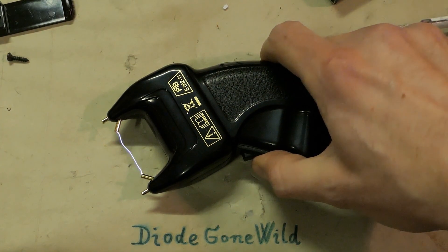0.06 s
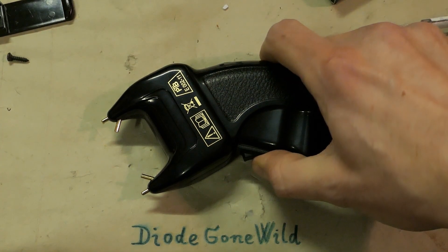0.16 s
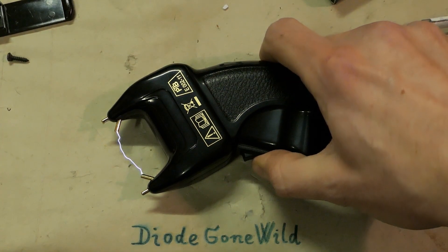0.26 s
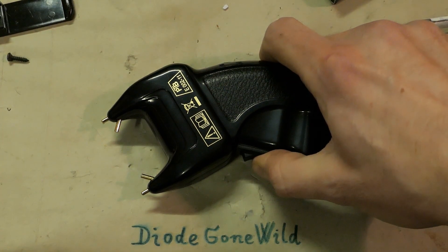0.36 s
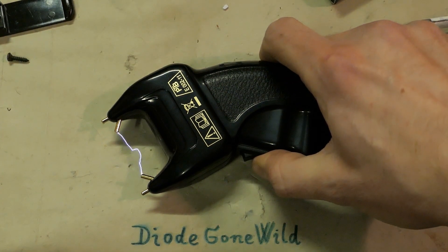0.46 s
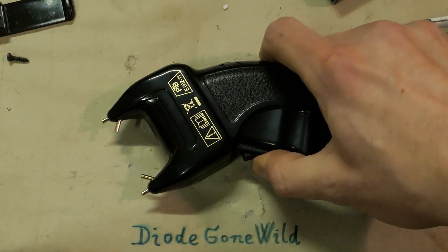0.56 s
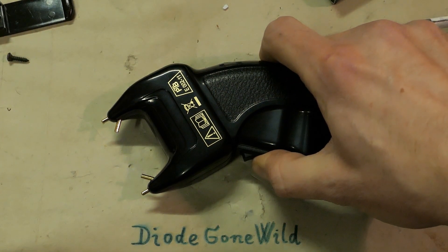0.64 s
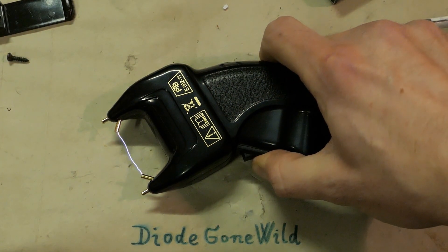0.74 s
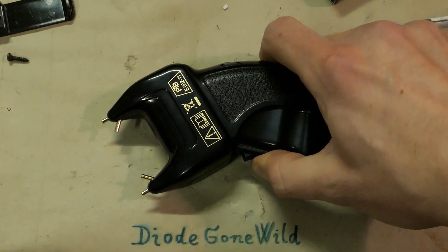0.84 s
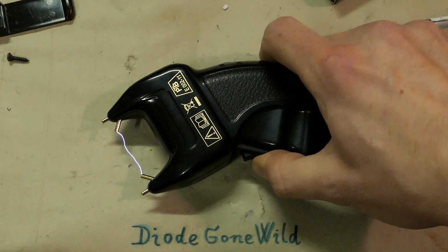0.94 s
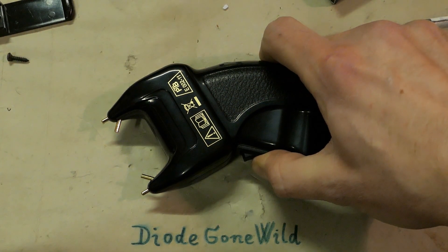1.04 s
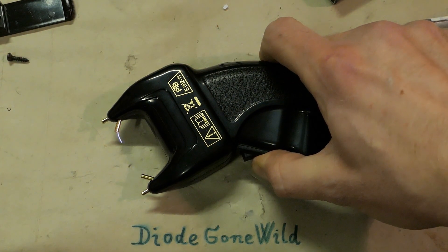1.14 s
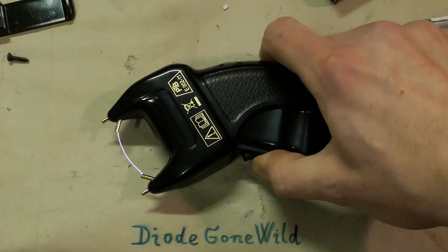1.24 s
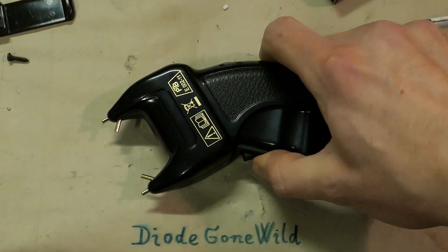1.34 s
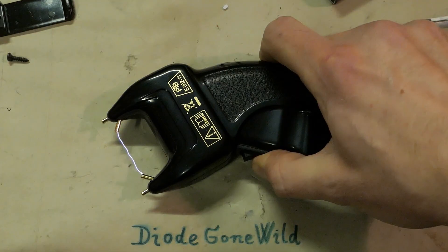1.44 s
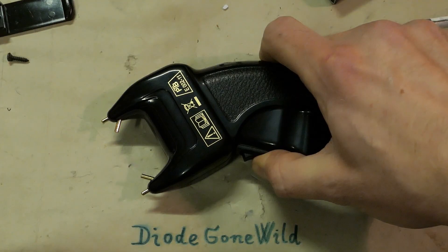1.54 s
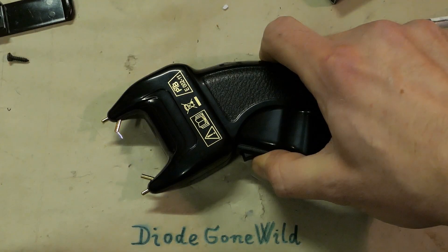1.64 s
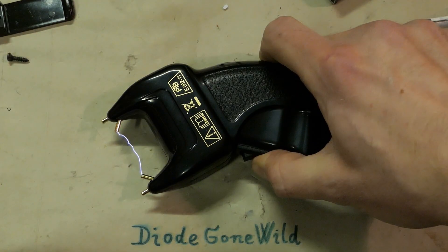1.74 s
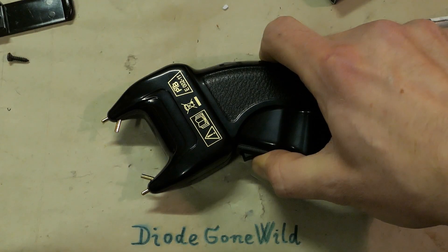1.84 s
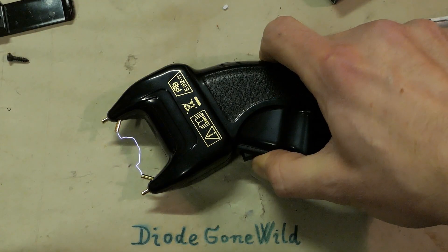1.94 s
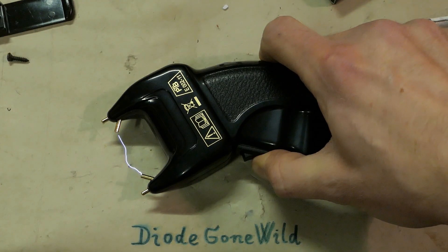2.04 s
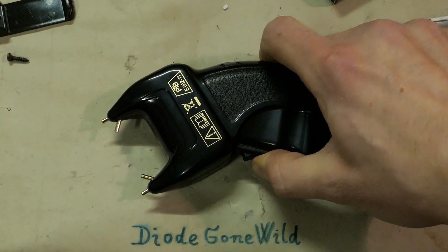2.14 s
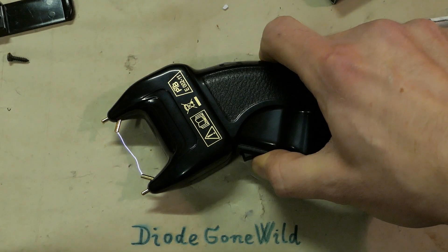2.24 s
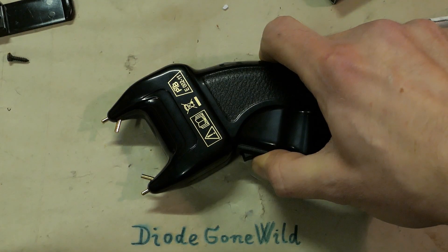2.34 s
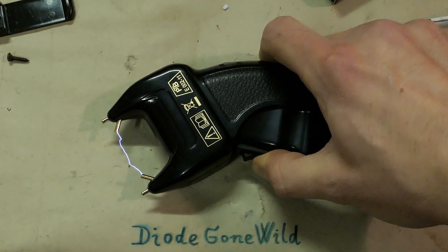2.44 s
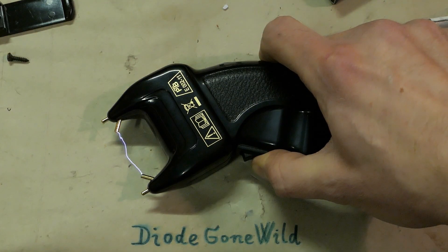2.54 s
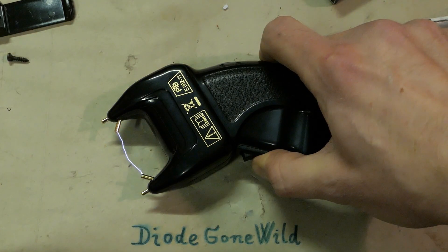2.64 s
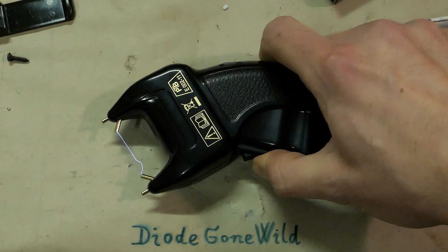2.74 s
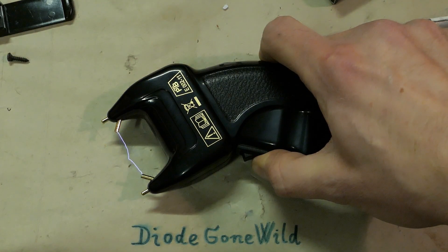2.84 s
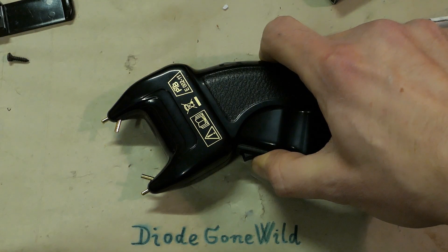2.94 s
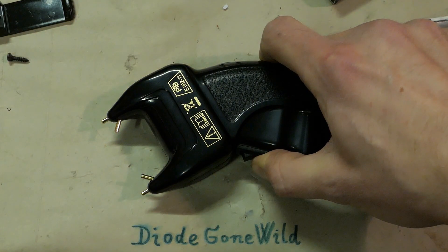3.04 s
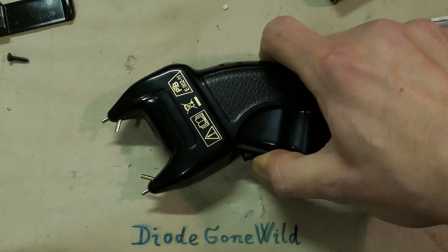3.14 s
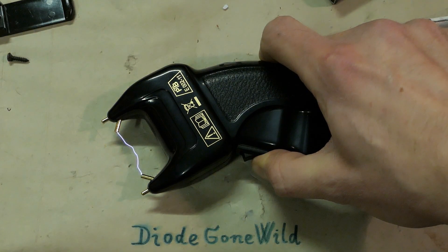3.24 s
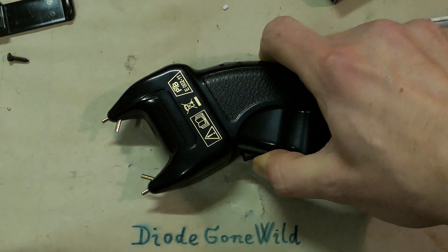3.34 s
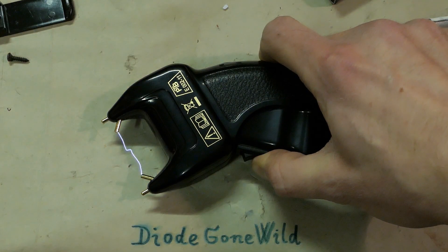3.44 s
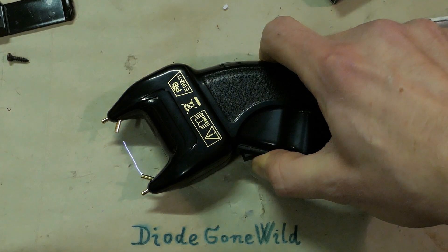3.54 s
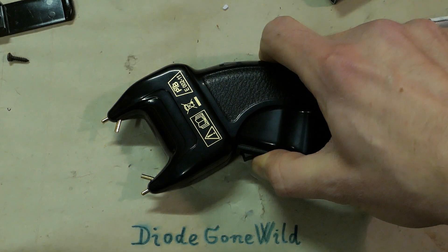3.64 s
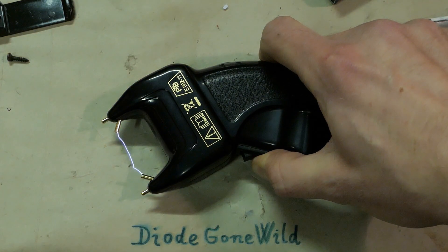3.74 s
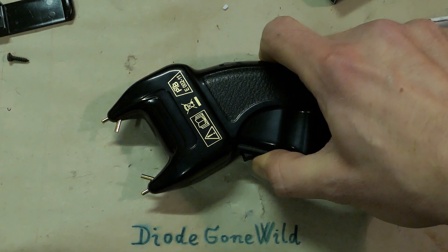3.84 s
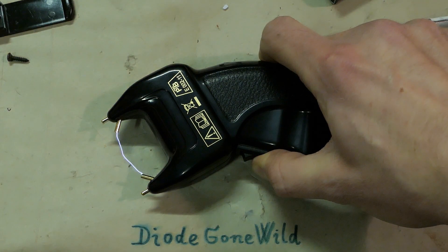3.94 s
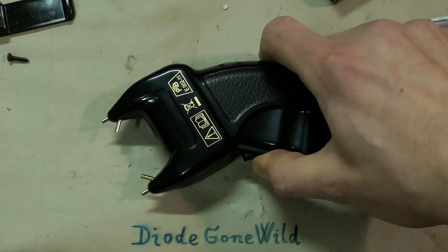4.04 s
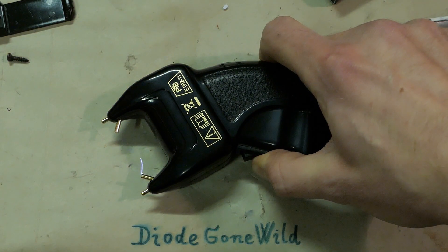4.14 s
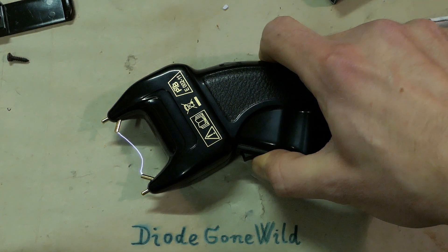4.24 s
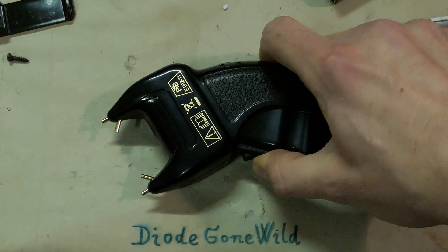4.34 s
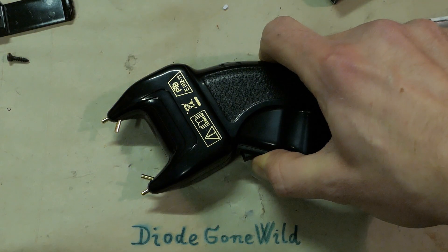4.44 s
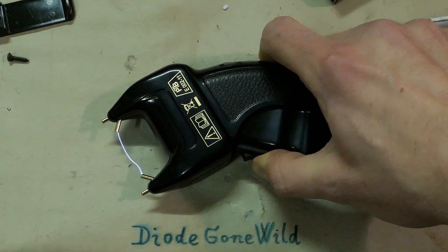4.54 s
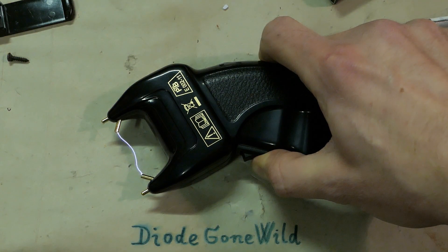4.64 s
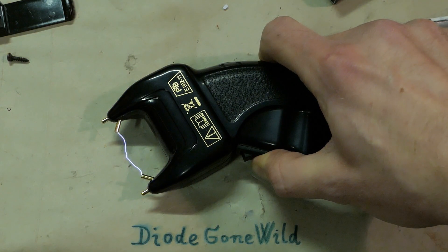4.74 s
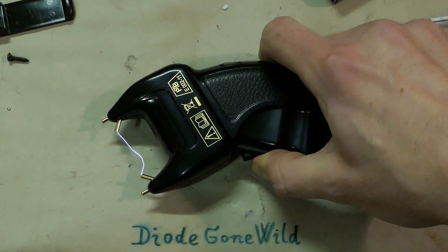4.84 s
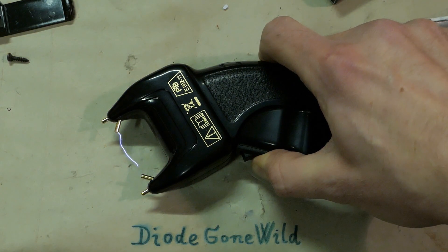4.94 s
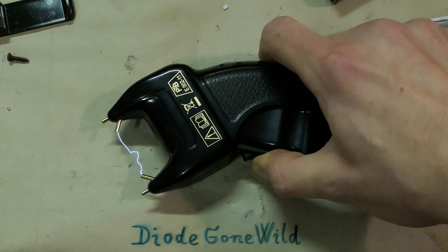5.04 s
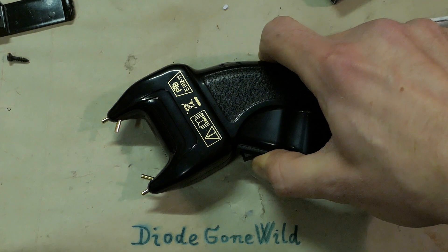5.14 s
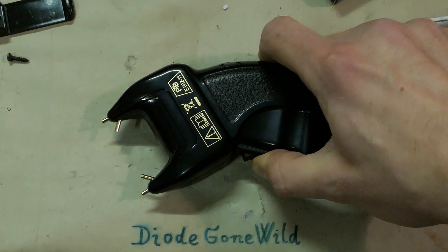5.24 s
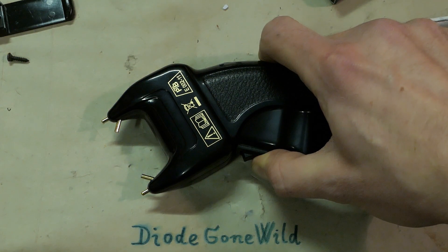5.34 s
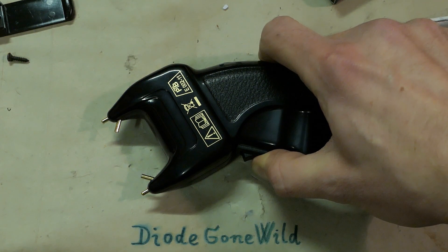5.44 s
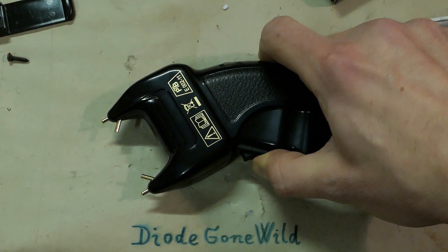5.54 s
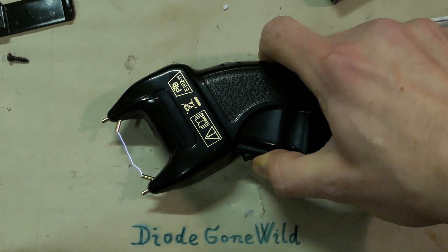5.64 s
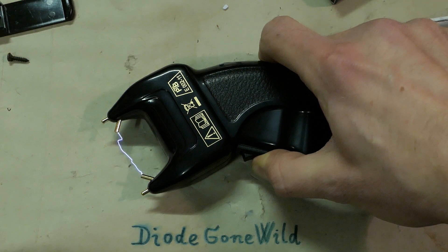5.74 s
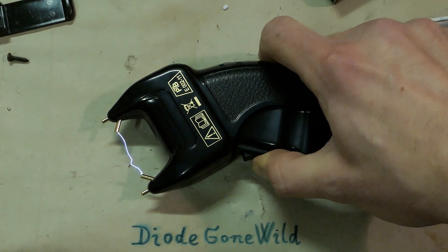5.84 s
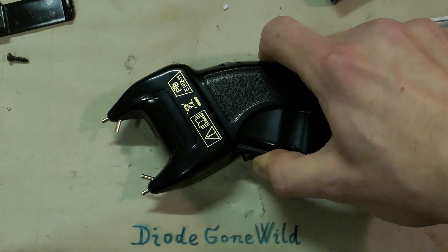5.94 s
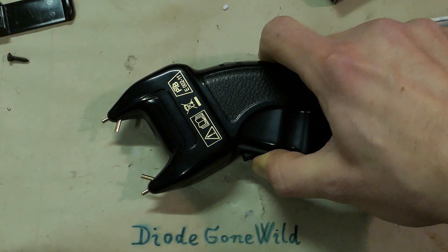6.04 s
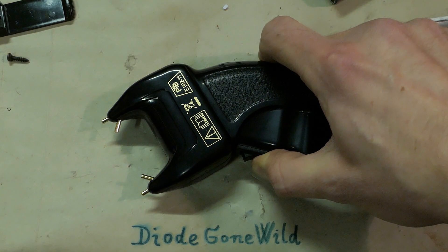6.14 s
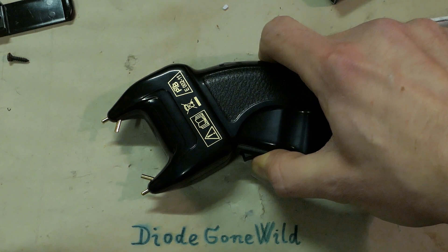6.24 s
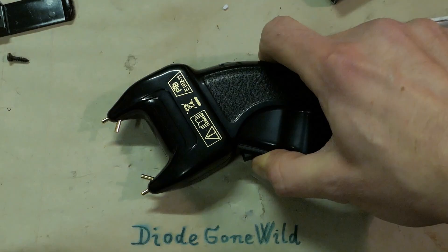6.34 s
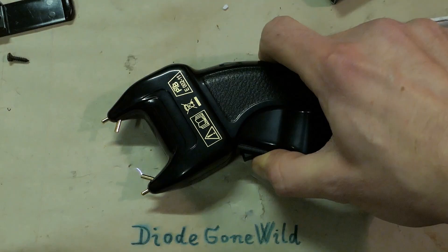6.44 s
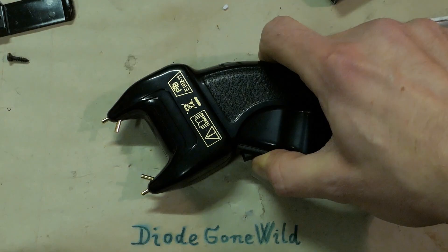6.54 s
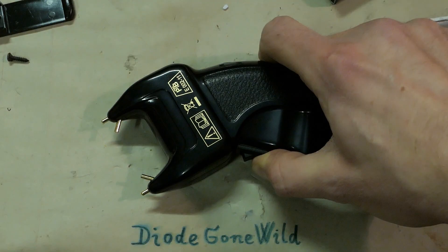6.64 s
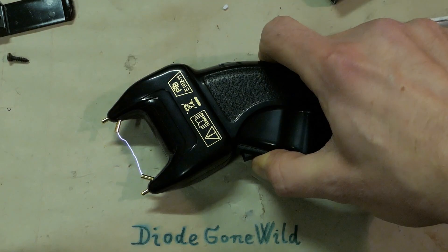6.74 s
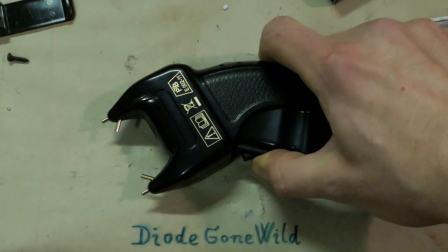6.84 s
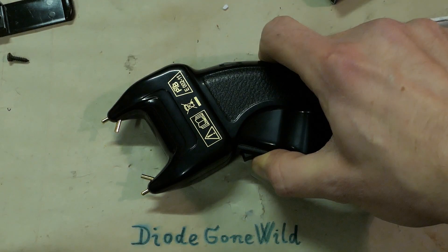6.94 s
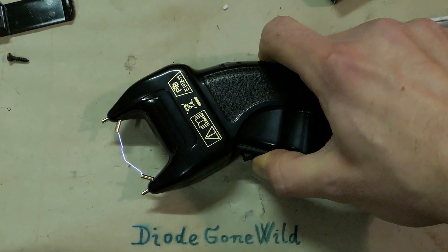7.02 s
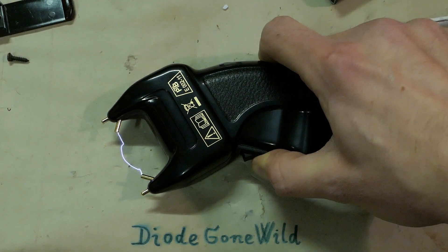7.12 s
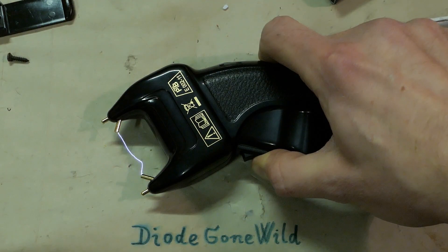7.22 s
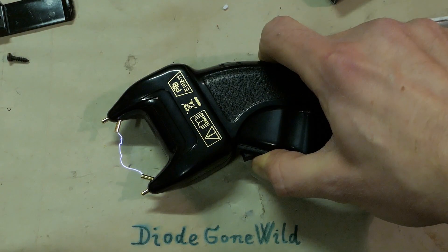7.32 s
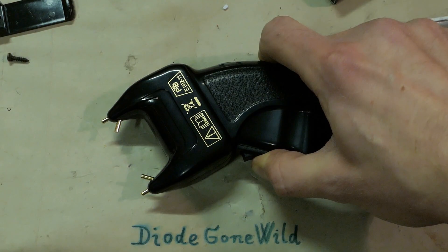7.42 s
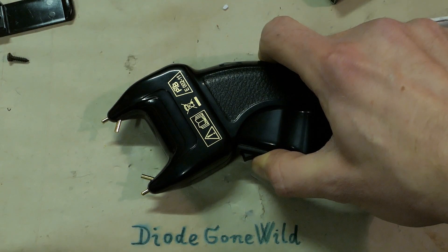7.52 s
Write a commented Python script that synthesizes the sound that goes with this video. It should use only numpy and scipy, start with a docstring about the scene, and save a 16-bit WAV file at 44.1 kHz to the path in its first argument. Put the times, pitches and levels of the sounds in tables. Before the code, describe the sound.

A stun gun held over a workbench is already firing at the start: sharp, bright electric snaps, about twenty-five a second, in a steady rattling clatter. Dull low thumps accompany the early sparks. Just before three seconds the snaps crowd together in a buzzing burst, then return to their former pace and slowly become sparser and weaker until the end. Close stereo microphone, small room, short reflections, very faint hiss.

```python
"""In a small room, a hand-held high-voltage device arcs across its electrodes above a workbench.
Each spark is a sharp crack (short pulses through broad resonances) with a soft low push of heated air.
Single echoes, bench clutter and a short room tail answer it. Jolts of the microphone circuit add dull thumps,
roughly opposite in the two channels and mostly faint later on. After a hurried burst near 2.6-2.9 s the sparks
gradually slow; the cracks weaken as the battery sags. Faint hiss lies underneath."""
import sys
import numpy as np
from scipy import signal
from scipy.fft import rfft, irfft
from scipy.io import wavfile

SR = 44100
rng = np.random.default_rng(int(sys.argv[2]) if len(sys.argv) > 2 else 0)


def dump(signal):
    """Clip the signal to [-1, 1] and save it as 16-bit WAV at the path in sys.argv[1]."""
    limited = np.clip(np.atleast_2d(signal).T, -1, 1)
    pcm = np.round(limited * 32767).astype(np.int16)
    wavfile.write(sys.argv[1], SR, pcm)


def level_to_linear(level):
    """Convert decibel levels to linear amplitude factors, elementwise."""
    exponent = np.asarray(level, float) / 20
    return 10 ** exponent


N = 334101
LEAD = 4410   # samples of run-up, cut off before the scene starts

# reflections scattered by bench and room, one frequency band per row:
# low_hz, high_hz, bench_db, bench_t60_s, room_db, room_t60_s, side_db (side relative to mid)
SCATTER_BANDS = [(150, 640, -29, 0.016, -52.5, 0.5, 3), (1000, 4220, -20.5, 0.032, -40, 0.4, -8),
                 (3860, 10140, -27.5, 0.015, -36.5, 0.13, -18), (8300, 20700, -45, 0.049, -39.5, 0.14, -4)]


def band(x, low_hz, high_hz):
    """Butterworth band-pass."""
    edges_hz = [low_hz, min(high_hz, 0.45 * SR)]
    return signal.sosfilt(signal.butter(2, edges_hz, "band", fs=SR, output="sos"), x)


def lowpass(x, hz):
    """First-order low-pass: a gentle dulling."""
    return signal.lfilter(*signal.butter(1, hz, fs=SR), x)


def highpass(x, order, hz):
    """Butterworth high-pass."""
    return signal.sosfilt(signal.butter(order, hz, "high", fs=SR, output="sos"), x)


def resonance(x, hz, width_hz):
    """Two-pole resonance with a gain of about 1 at its peak."""
    radius = np.exp(-np.pi * width_hz / SR)
    zeros = (1 - radius ** 2) / 2 * np.array([1, 0, -1])
    poles = [1, -2 * radius * np.cos(2 * np.pi * hz / SR), radius ** 2]
    return signal.lfilter(zeros, poles, x)


def all_pass(x, pole):
    """First-order all-pass: a positive pole delays the lows more, a negative one the highs."""
    return signal.lfilter([-pole, 1], [1, -pole], x)


def convolve(x, response):
    """Long convolution along time, cut to the length of x."""
    return signal.fftconvolve(x, response, axes=-1)[..., :x.shape[-1]]


def strengths(s):
    """Relative crack and thump levels in dB, from spark time, the wait before it and chance."""
    # usual size of the thump over time: time_s, level_db (relative)
    usual_thumps = [(0, -21), (2.4, -22.5), (3.2, -29), (4.2, -32.), (4.9, -46), (7.6, -54)]
    # sparks that thump harder than their neighbours: time_s, level_db (relative)
    hard_thumps = [(2.138, -17), (2.256, -17.5), (5.827, -37), (5.889, -38), (6.016, -29), (6.160, -33),
                   (6.728, -35), (7.173, -33), (7.377, -43)]
    usual_wait_s = 0.04
    start_db, sag_db_per_s = -3.5, 0.9063
    crack_db_per_doubled_wait, crack_spread_db = 2, 0.74
    thump_db_per_doubled_wait, thump_spread_db = 8, 4.5

    doublings = np.log2(np.diff(s, prepend=s[0] - usual_wait_s) / usual_wait_s)
    chance = rng.standard_normal((len(s), 2))
    crack_db = start_db - sag_db_per_s * s   # the battery sags
    crack_db += crack_db_per_doubled_wait * doublings   # a longer wait stores more charge
    crack_db += crack_spread_db * chance[:, 0]
    thump_db = np.interp(s, *np.transpose(usual_thumps))
    thump_db += thump_spread_db * np.minimum(chance[:, 1], 1)
    thump_db += thump_db_per_doubled_wait * np.minimum(doublings, 0)   # hurried sparks hardly thump
    for hard_s, hard_db in hard_thumps:
        thump_db[np.argmin(abs(s - hard_s))] = hard_db
    return crack_db, thump_db


def cracks(at, level_db):
    """The arc is a line source: a near-end shock, then a duller far-end one of opposite sign; returns both."""
    # broad resonances that colour the crack: centre_hz, width_hz, level_db (relative)
    crack_modes = [(1180, 2400, -13.5), (2920, 7860, -5.5), (7254, 1150, 3.5), (10490, 2310, -0.5),
                   (14230, 2350, 2.5)]
    span_ms, bend = 0.222, 0.13   # lag from end to end, its relative spread
    far_db, far_hz = -4, 9000
    colour_db = 0.5   # spread of each resonance from spark to spark
    kink, kink_spread = 0.11, 0.11   # shock from near the middle, relative to the near end

    # the path bends anew each time, which shifts the lag and the colour
    chance = rng.standard_normal((len(at), 2 + len(crack_modes)))
    lag = span_ms * SR / 1000 * (1 + bend * chance[:, 0])
    whole, part = lag.astype(int), lag % 1
    shocks = 0
    for k, (hz, width_hz, mode_db) in enumerate(crack_modes):
        ends = np.full((2, N + LEAD), 1e-18)
        height = level_to_linear(level_db + mode_db + colour_db * chance[:, 1 + k])
        ends[0, at] = height
        ends[0, at + whole // 2] = height * (kink + kink_spread * chance[:, -1])
        # the lag falls between two samples
        ends[1, at + whole] = height * (1 - part)
        ends[1, at + whole + 1] = height * part
        shocks = shocks + (-1) ** k * resonance(ends, hz, width_hz)
    shocks[1] = -level_to_linear(far_db) * lowpass(shocks[1], far_hz)
    return level_to_linear(6.5) * shocks


def pushes(at, level_db):
    """The heated air swells: a soft low push under every crack."""
    below_crack_db, spread_db = 2.0, 2.0
    swell = np.full(N + LEAD, 1e-18)
    swell[at] = -level_to_linear(level_db - below_crack_db + spread_db * rng.standard_normal(len(at)))
    return band(swell, 170, 800)


def thumps(at, level_db):
    """Jolts of the microphone circuit, smoothed, then made to swing back and forth by the coupling high-pass."""
    soft_hz, edge_hz, smear_hz, coupling_hz = 900, 3000, 600, 190
    lag_ms, uneven, leak_db = 0.18, 0.16, -17

    chance = rng.standard_normal((len(at), 2))
    # either sign, opposed left to right and never quite equal in size
    sides = np.sign(chance[:, 0]) * [[1], [-1]] + uneven * chance[:, 1]
    jolts = np.full((2, N + LEAD), 1e-18)
    jolts[:, at + round(lag_ms * SR / 1000)] = level_to_linear(level_db + 30.5) * sides
    jolts = lowpass(lowpass(jolts, soft_hz), edge_hz)
    jolts = all_pass(jolts, np.exp(-2 * np.pi * smear_hz / SR))   # a falling chirp
    leak = level_to_linear(leak_db) * jolts * [[1], [0.6]]   # a little deep bass gets past, more on the left
    return highpass(jolts, 2, coupling_hz) + leak


def echoes():
    """Impulse response, left and right, of the direct path and the single echoes."""
    # echoes off bench, hand and walls: delay_ms, low_db, high_db, pan_db (left over right)
    echo_paths = [(1.44, -6, -30, 0), (1.86, -22, -24, -2), (3.9, -20, -28, -2), (5.2, -21, -36, -1),
                  (10.0, -23, -24, 4), (10.45, -20, -30, -1), (11.13, -25, -19, -4), (11.9, -27, -19, 0),
                  (14.33, -27, -23, 1), (15.0, -22, -30, 0), (20.7, -25, -32, 0)]
    split_hz, direct_pan_db, port_gap = 5000, 1.35, 0.32

    lows, highs = np.zeros((2, 2, 2048))
    for delay_ms, low_db, high_db, pan_db in echo_paths:
        sides = level_to_linear(np.array([pan_db, -pan_db]) / 2)
        lows[:, round(delay_ms * SR / 1000)] += level_to_linear(low_db) * sides
        highs[:, round(delay_ms * SR / 1000)] += level_to_linear(high_db) * sides
    split = signal.butter(2, split_hz, fs=SR)
    response = signal.lfilter(*split, lows) + highs - signal.lfilter(*split, highs)
    response[:, 1] = level_to_linear(np.array([direct_pan_db, -direct_pan_db]) / 2)
    # the left port is a fraction of a sample nearer
    response[:, [0, 2]] = port_gap / 2 * np.array([[1.0, 0.046], [-0.054, 1]])
    return response


def grains(count, low_hz, high_hz, side_db):
    """Uneven, grainy stereo reflections in one band, before any decay."""
    mid, side = band(rng.laplace(0, 1, (2, count)), low_hz, high_hz)
    return mid + level_to_linear(side_db) * side * [[1], [-1]]


def clutter(x, at):
    """Quick reflections off things on the bench; each spark takes one of a few paths, each with its own answer."""
    paths, start_s = 4, 0.0006
    s, heard = np.arange(1024) / SR, 0
    latest_spark = np.searchsorted(at, np.arange(len(x)), "right")
    path = rng.integers(0, paths, len(at) + 1)[latest_spark]
    for k in range(paths):
        answer = 0
        for low_hz, high_hz, bench_db, bench_t60_s, _, _, side_db in SCATTER_BANDS:
            decay = level_to_linear(bench_db - 60 * s / bench_t60_s) * (s > start_s)
            answer = answer + decay * grains(len(s), low_hz, high_hz, side_db)
        taken = (x * (path == k))[None]
        heard = heard + signal.oaconvolve(taken, answer, axes=-1)[:, :len(x)]
    return heard


def scatter():
    """Impulse response of dense room reflections: quiet at first, boosted as the walls answer, then decaying."""
    room_starts_ms, first_walls_db, first_walls_s = 8.4, 6, 0.011
    s, response = np.arange(SR // 2) / SR, 0
    since = s - room_starts_ms / 1000
    boost = level_to_linear(first_walls_db * np.exp(-abs(since) / first_walls_s) * (since > 0))
    walls = np.clip(since / 0.002, 0.25, 1) * boost
    for low_hz, high_hz, _, _, room_db, room_t60_s, side_db in SCATTER_BANDS:
        decay = level_to_linear(room_db - 60 * s / room_t60_s)
        response = response + walls * decay * grains(len(s), low_hz, high_hz, side_db)
    return response


def hiss():
    """Faint room and microphone noise: shaped white noise, its own in each channel."""
    # noise spectrum: pitch_hz, level_db (relative, per Hz)
    noise_curve = [(30, 16), (60, 8), (300, 7.5), (2000, -29), (8000, -36), (16000, 2.5)]
    rms_db = -65.5
    hz, level_db = np.transpose(noise_curve)
    bins_hz = np.arange(1, N // 2 + 2) * SR / N
    shape = level_to_linear(np.interp(np.log(bins_hz), np.log(hz), level_db))
    noise = irfft(rfft(rng.standard_normal((2, N))) * shape, N)
    return level_to_linear(rms_db) * noise / noise.std()


def scene():
    """Sparks heard through bench and room, with thumps and hiss."""
    # when the gap breaks down: start_s
    spark_times = [0.0346, 0.0744, 0.1137, 0.154, 0.194, 0.2331, 0.275, 0.3125, 0.3517, 0.3922, 0.432,
                   0.4729, 0.5133, 0.5523, 0.591, 0.6301, 0.6716, 0.7099, 0.7511, 0.791, 0.8303, 0.8711,
                   0.9102, 0.9498, 0.9875, 1.026, 1.0615, 1.1017, 1.14, 1.1791, 1.217, 1.2569, 1.2945,
                   1.3348, 1.372, 1.4128, 1.4522, 1.4904, 1.5288, 1.5642, 1.6022, 1.6402, 1.6791, 1.7177,
                   1.7555, 1.796, 1.8322, 1.8711, 1.9097, 1.9471, 1.9838, 2.021, 2.0587, 2.0991, 2.1379,
                   2.1774, 2.2147, 2.2559, 2.293, 2.3301, 2.3675, 2.4046, 2.4432, 2.4811, 2.5202, 2.5601,
                   2.5891, 2.6114, 2.6343, 2.6527, 2.6919, 2.7287, 2.7455, 2.762, 2.7782, 2.791, 2.8083,
                   2.8241, 2.837, 2.8589, 2.8772, 2.892, 2.9261, 2.9666, 3.0163, 3.0694, 3.1166, 3.1705,
                   3.2079, 3.2503, 3.2866, 3.325, 3.3635, 3.4019, 3.4413, 3.4828, 3.5244, 3.5631, 3.599,
                   3.6339, 3.6659, 3.7057, 3.7457, 3.7858, 3.8232, 3.861, 3.903, 3.942, 3.9829, 4.027,
                   4.0709, 4.1153, 4.1596, 4.1996, 4.2422, 4.2916, 4.3332, 4.3767, 4.4164, 4.4594, 4.505,
                   4.5564, 4.598, 4.6428, 4.6876, 4.7385, 4.7941, 4.8448, 4.8854, 4.932, 4.9803, 5.0156,
                   5.0529, 5.0901, 5.1271, 5.1725, 5.2217, 5.2644, 5.311, 5.358, 5.4031, 5.4522, 5.5079,
                   5.5567, 5.602, 5.6514, 5.6933, 5.7361, 5.7812, 5.8272, 5.8891, 5.925, 5.9625, 6.0162,
                   6.0664, 6.114, 6.1602, 6.2075, 6.2669, 6.3212, 6.3619, 6.4123, 6.4587, 6.5002, 6.5486,
                   6.6064, 6.66, 6.7279, 6.786, 6.8304, 6.8764, 6.92, 6.9683, 7.0179, 7.0709, 7.1184,
                   7.1734, 7.2256, 7.2705, 7.328, 7.377, 7.431, 7.4985, 7.5534]
    earlier_spark_s = -0.0048   # still ringing at the start
    s = np.r_[earlier_spark_s, spark_times]
    at = np.round(s * SR).astype(int) + LEAD
    crack_db, thump_db = strengths(s)
    near, far = cracks(at, crack_db)
    push = pushes(at, crack_db)
    heard = convolve((near + far)[None], echoes()) + push + thumps(at, thump_db)
    # scattered paths hear the arc from all sides: near shock only, so no comb
    scattered = near + push
    heard += clutter(scattered, at)
    heard += convolve(scattered[None], scatter())
    return heard[:, LEAD:] + hiss()


def low_pass(x):
    """Removes everything above the highest recorded frequency."""
    return signal.sosfilt(signal.butter(12, 16800, fs=SR, output="sos"), x)


def record(dry):
    """The microphone cuts deep bass and top, dips near 5 kHz and spreads each crack in time."""
    x = highpass(dry, 1, 30)
    x = signal.sosfilt(signal.butter(6, 15200, fs=SR, output="sos"), x)
    x = x - 0.49 * resonance(x, hz=5080, width_hz=1050)
    for pole in 0.45, 0.45, -0.5:
        x = all_pass(x, pole)
    return low_pass(x)


dry = scene()
out = record(dry)
dump(out)
```